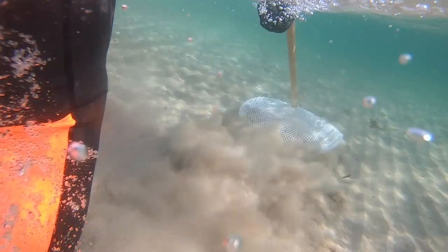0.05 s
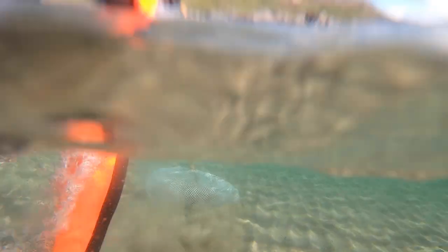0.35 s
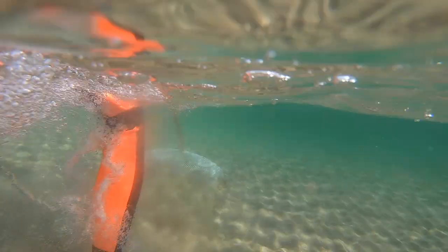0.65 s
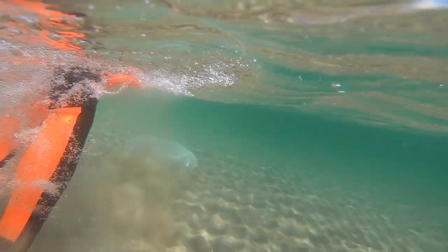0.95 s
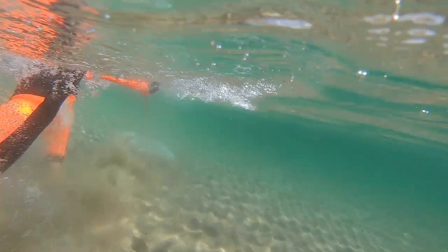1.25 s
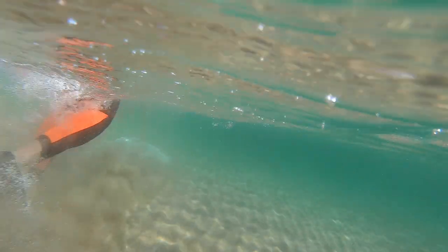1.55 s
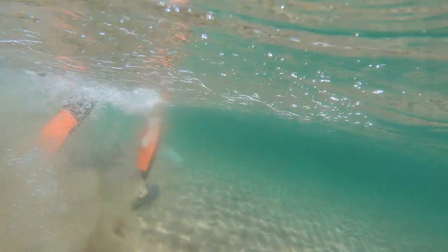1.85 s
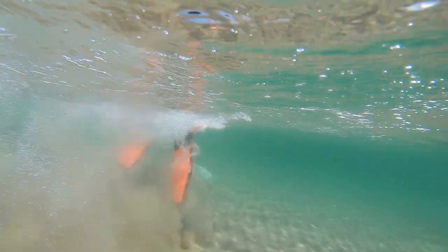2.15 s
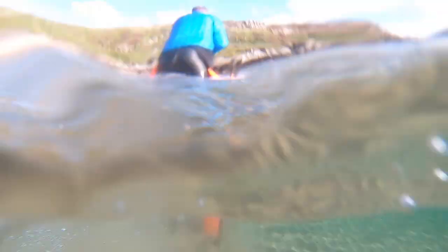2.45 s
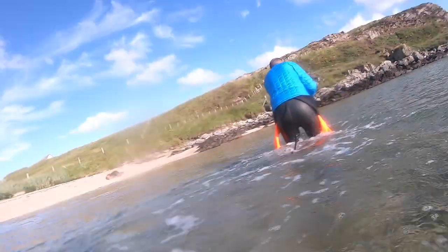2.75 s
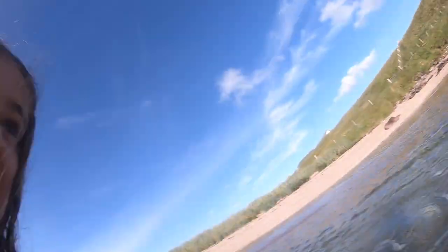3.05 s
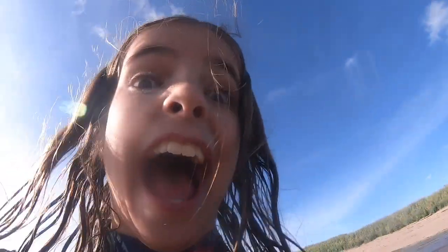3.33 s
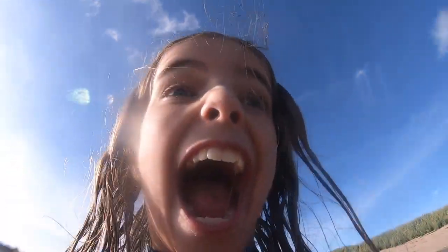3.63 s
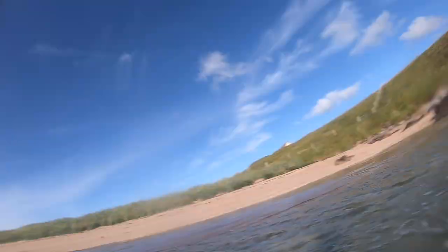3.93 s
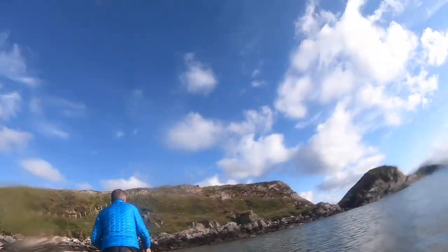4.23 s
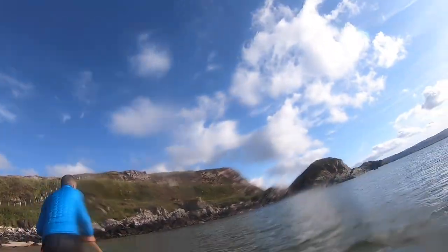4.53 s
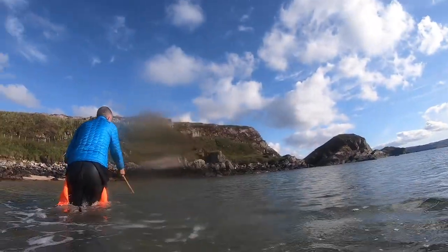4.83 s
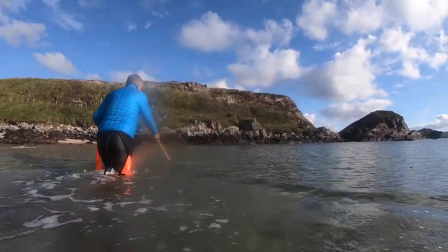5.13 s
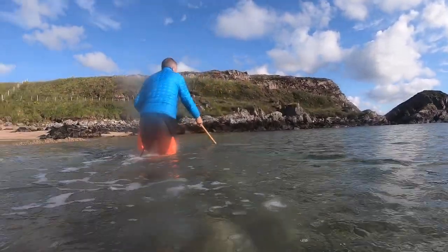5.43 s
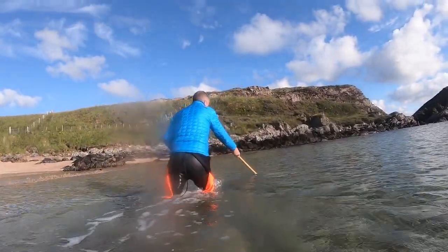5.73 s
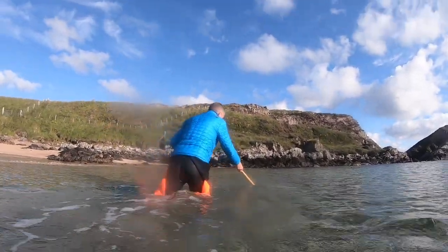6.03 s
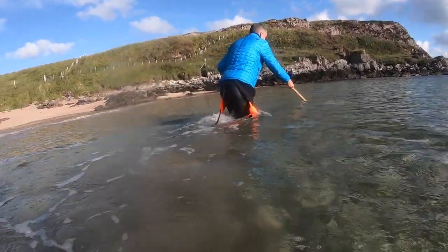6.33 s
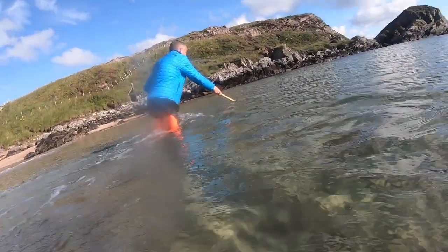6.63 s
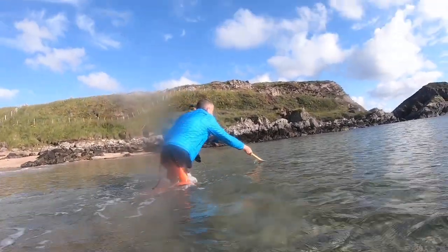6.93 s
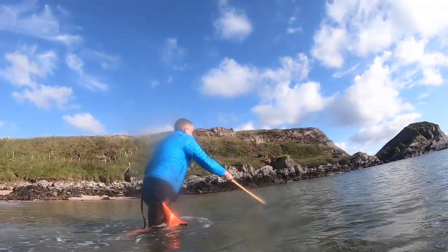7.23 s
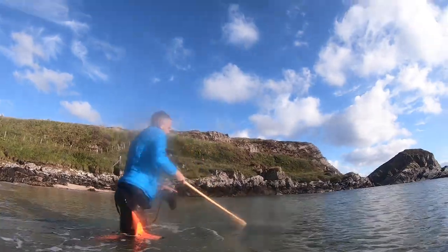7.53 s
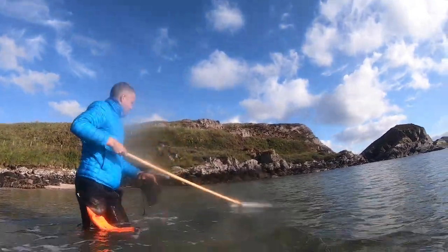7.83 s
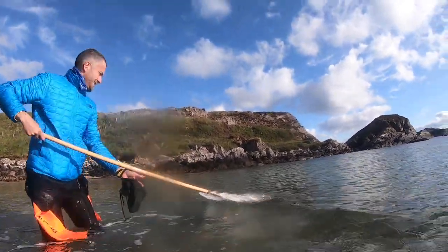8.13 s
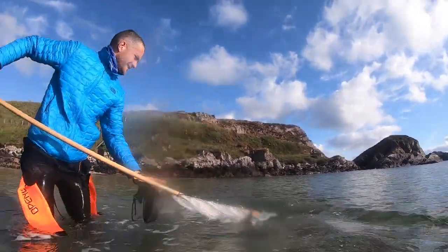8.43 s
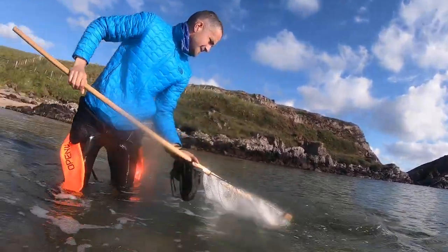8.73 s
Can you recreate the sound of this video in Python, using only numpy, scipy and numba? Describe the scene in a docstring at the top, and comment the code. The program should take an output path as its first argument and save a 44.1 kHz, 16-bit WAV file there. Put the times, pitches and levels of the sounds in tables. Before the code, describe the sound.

Muffled sloshing and the soft fizz of stirred sand surround a small waterproof microphone in the sea shallows. It rises into the open, where someone wading with a hand net sets off irregular splashes, trickles and ringing bubbles, very close. Low slaps and rumbling buffets hit the casing throughout, and for a stretch toward the end the water sounds hollow and boxed in.

```python
"""Shallow sea water sloshes in bursts of bubbles over a small waterproof housing, behind a wader's hand net.
Submerged, stirred sand and foam fizz dully; at 2.45 s the housing surfaces among lapping wavelets.
Single bubbles ring as they pop, air pockets glug, and water pours through a small cavity at the two ports.
Slaps and air buffets boom in the housing. From about 5.7 to 8.3 s the sound turns mono and hollow."""
import sys
import numpy as np
from scipy import signal
from scipy.fft import rfft, irfft, next_fast_len
from scipy.io import wavfile
from scipy.ndimage import uniform_filter1d
from numba import njit

SR = 44100
rng = np.random.default_rng(int(sys.argv[2]) if len(sys.argv) > 2 else 0)


def to_wav(s):
    """Save 16-bit WAV."""
    ch = np.atleast_2d(s).T  # columns
    pcm = np.round(np.clip(ch, -1, 1) * 32767)  # PCM
    wavfile.write(sys.argv[1], SR, pcm.astype(np.int16))


N = 391608
TIME_S, CONTROL_S = np.arange(N) / SR, np.arange(0, N / SR, .002)
SURFACING_S, LEAK_TOP_HZ = 2.45, 8700


def undb(db):
    """Decibels to gain."""
    return 10 ** (np.asarray(db) / 20)


def unit(x):
    """Scale to rms 1."""
    return x / np.sqrt(np.mean(x ** 2) + 1e-18)


def lowpass(f, edge_hz, slope):
    """Low-pass gain, 1/2 at the edge."""
    return 1 / (1 + (f / edge_hz) ** slope)


def highpass(f, edge_hz, slope):
    """High-pass gain, 1/2 at the edge."""
    return 1 / (1 + (edge_hz / f) ** slope)


def shape(x, gain):
    """Filter by a function of frequency."""
    size = next_fast_len(x.shape[-1] + 512)
    hz = np.maximum(np.fft.rfftfreq(size, 1 / SR), 1)
    return irfft(rfft(x, size) * gain(hz), size)[..., :x.shape[-1]]


def along(points, hz):
    """Interpolate (Hz, value) points in log frequency."""
    f, value = np.transpose(points)
    return np.interp(np.log(hz), np.log(f), value)


def curve(points):
    """Interpolate (s, value) points per sample."""
    return np.interp(TIME_S, *np.transpose(points))


def sampled(control):
    """Control rate to sample rate."""
    return np.interp(TIME_S, CONTROL_S, control)


def swell(start, end, rise, fall):
    """Control-rate gain: 1 from start to end, 21 dB lower per rise or fall time outside."""
    slope = np.maximum((start - CONTROL_S) / rise, (CONTROL_S - end) / fall)
    return undb(-21 * np.clip(slope, 0, 20))


def add(out, start, x):
    """Mix x in at start [s]."""
    i = int(start * SR)
    out[:, i:i + x.shape[-1]] += x[..., :N - i]


def walk(rate_hz, size=N):
    """Slewed random steps, rms near 1."""
    hold = int(SR / rate_hz)
    steps = np.repeat(rng.standard_normal(size // hold + 2), hold)
    return unit(uniform_filter1d(steps, hold))[:size]


def noise(size, apart):
    """Stereo noise; apart is the side/mid ratio."""
    mid, side = rng.standard_normal((2, size))
    return unit(np.array([mid + apart * side, mid - apart * side]))


def resonance(hz, width_hz):
    """Noise band with a moving centre."""
    a, b = unit(shape(rng.standard_normal((2, len(hz))), lambda f: lowpass(f, width_hz, 2)))
    phase = 2 * np.pi * np.cumsum(hz) / SR
    return a * np.sin(phase) + b * np.cos(phase)


@njit
def ring(size, start, hz, t60, gain, pan, glide, onset):
    """Damped sines that swell over `onset` cycles and glide up as each bubble nears the surface."""
    out = np.zeros((2, size))
    for k in range(len(start)):
        first, life = int(start[k] * SR), int(t60[k] * SR) + 2
        phasor = gain[k] + 0j
        step = np.exp(2j * np.pi * hz[k] / SR - np.log(1000) / life)
        bend = np.exp(2j * np.pi * hz[k] * glide / SR / life)
        for i in range(first, min(first + life, size)):
            cycles = (i - first) * hz[k] / SR
            y = phasor.imag * cycles ** 2 / (cycles ** 2 + onset ** 2)
            out[0, i] += y * pan[k]
            out[1, i] += y / pan[k]
            phasor, step = phasor * step, step * bend
    return out


def bubbles(size, hz, cycles, scatter_db, glide, onset):
    """Bubble cloud at the given pitches; random birth, level, decay and pan."""
    when, rank = rng.random((2, len(hz)))
    life, side = rng.standard_normal((2, len(hz)))
    hz = np.clip(hz, 150, 15000)
    gain = undb(-scatter_db * np.log(0.03 + rank))
    t60 = cycles * np.exp(0.63 * life) / hz
    return unit(ring(size, when * size / SR, hz, t60, gain, undb(2 * side), float(glide), onset + .01))


# dips in the small water sounds: (time [s], length [s])
LEVEL_DIPS = [(0.0, 0.2), (1.669, 0.047), (2.461, 0.1), (5.479, 0.18)]
def ducking_gain():
    """The small water sounds briefly dip 8 dB, mostly after loud pops."""
    dip = sum(swell(start, start + length, rise=.0089, fall=.0089) for start, length in LEVEL_DIPS)
    return sampled(undb(-8 * np.clip(dip, 0, 1)))


# sand and foam below, wavelets above: (crest [s], rise [s], fall [s], ripple [dB], fizz [dB])
WATER_SWELLS = [(.42, 0.13, 0.49, -36, -51), (.92, 0.029, 0.05, -48, -50), (1.4, 0.7, 0.34, -40.5, -57.5),
                (1.869, 0.33, 0.23, -42, -48.5), (2.77, 0.32, 0.079, -35, -53),
                (3.574, 0.43, 0.29, -36.5, -44.5), (4.17, 1, 0.92, -35.5, -57),
                (5.29, 0.22, 0.13, -30.5, -46), (5.61, 0.053, 0.067, -24.5, -40.5),
                (6.017, 0.0095, 0.13, -37.5, -38), (7.034, 0.27, 0.11, -30.5, -66),
                (8.0, 0.09, 0.66, -45.5, -62), (8.407, 0.095, 0.081, -41, -41)]
def stirring():
    """Envelopes of water motion: ripple and fizz from calm, swells and wakes; force from sloshes."""
    ripple_power = undb(np.where(CONTROL_S < SURFACING_S, -46, -44)) ** 2
    fizz_power, wake_power, force_power = undb(-61) ** 2, 0, 0
    for crest, rise, fall, ripple_db, fizz_db in WATER_SWELLS:
        envelope = swell(crest, crest, rise, fall)
        ripple_power += (envelope * undb(ripple_db)) ** 2
        fizz_power += (envelope * undb(fizz_db)) ** 2
    for start, length, db, _ in HOUSING_SLOSHES:
        crest = start + SLOSH_CREST_SHARE * length
        force_power += undb(db) ** 2 * np.exp(-((CONTROL_S - crest) / (length / 2)) ** 2)
        if start > SURFACING_S:
            wake_power += (undb(db) * swell(crest, start + length, rise=.046, fall=.052)) ** 2
    ripple_power += wake_power * undb(-14) ** 2
    fizz_power += wake_power * undb(-59) ** 2
    return [sampled(np.sqrt(power)) for power in (ripple_power, fizz_power, force_power)]


# water spectra below and above the surface: (frequency [Hz], level [dB])
SUBMERGED_EQ = [(300, -4), (930, 6), (2400, -5), (3450, -4), (5000, -8.5), (6400, -23.5), (10200, -23),
                (11500, -48)]
SURFACE_EQ = [(350, -21.5), (750, -9.5), (1350, -7.5), (1900, -2.5), (2400, -3), (3400, -6.5),
              (4600, -16.5), (7000, -32), (10000, -44.5), (13000, -67.5)]
def shallows(ripple, fizz):
    """Countless small bubbles in a soft wash, smoother under water."""
    hz = 300 + 12000 * rng.random(int(1900 * N / SR)) ** 2
    cloud = bubbles(N, hz, cycles=14, scatter_db=2.8, glide=0.03, onset=2.5)
    cloud = unit(shape(cloud, lambda f: f ** 0.77))
    above = np.clip((TIME_S - SURFACING_S) / .04, 0, 1)
    wash = noise(N, apart=0.78)
    water = above * unit(cloud + undb(-0.5) * wash) + (1 - above) * unit(cloud + undb(4) * wash)
    out = 0
    for eq, share, gurgle_db in ((SUBMERGED_EQ, 1 - above, -5.5), (SURFACE_EQ, above, -11)):
        gurgle = ripple * undb(gurgle_db)
        for lo, hi, gain in ((290, 1150, gurgle), (930, 3425, ripple), (5060, 12000, fizz)):
            band = shape(water, lambda f: undb(along(eq, f)) * highpass(f, lo, 10) * lowpass(f, hi, 10))
            out += unit(band) * share * gain
    lapping = undb(2.2 * walk(45) + 1.5 * walk(13))
    return out * lapping * ducking_gain()


# bubble pitches under water: (pitch [Hz])
PING_PITCHES_HZ = (931, 1663, 3404)
def stray_bubbles(ripple, force):
    """Stirred water sheds bubbles: steady pings below the surface, clusters of short plops above."""
    count = int(70 * N / SR)
    spread = np.clip(rng.standard_normal(count), -2, 2)
    ping_hz = rng.choice(PING_PITCHES_HZ, count) * 2 ** (.09 * spread)
    pings = bubbles(N, ping_hz, cycles=50, scatter_db=5, glide=0, onset=1)
    plops = bubbles(N, 1800 * 2 ** (.4 * spread), cycles=26, scatter_db=5.5, glide=.06, onset=2)
    clusters = np.clip(walk(12), 0, 1.5)
    above = plops * clusters * undb(-3) * (ripple + force * undb(-13))
    return np.where(TIME_S > SURFACING_S, above, pings * ripple * undb(-4)) * ducking_gain()


SLOSH_CREST_SHARE = 0.54
# slosh textures: (bubble rate [1/s], spread [oct], spray [dB], cutoff [Hz], treble leak [dB])
SUBMERGED_CHURN = (506, 0.67, 5.5, 2131, -34.5)
SURFACE_SPLASH = (380.5, .5, -8.5, 4305, -27)
# water over the housing: (time [s], length [s], level [dB], centre [Hz])
HOUSING_SLOSHES = [(0.0, 0.066, -25.5, 948), (0.105, 0.04, -15.5, 1732), (1.291, 0.073, -27, 900),
                   (1.398, 0.27, -27.5, 930), (2.081, 0.12, -23, 1230), (2.159, 0.15, -14.5, 1507),
                   (2.283, .11, -15.5, 1065), (2.709, .14, -21, 1577), (3.205, 0.088, -26, 989),
                   (3.661, 0.062, -29.5, 986), (4.214, 0.07, -24.5, 1750), (4.374, 0.036, -24, 1150),
                   (4.584, 0.044, -26.5, 1320), (4.809, 0.022, -15, 1895), (4.861, 0.071, -27.5, 1290),
                   (5.336, 0.022, -19.5, 1805), (5.386, 0.038, -18.5, 1405), (5.45, 0.019, -19, 1393),
                   (5.584, 0.095, -21, 1520), (6.143, 0.065, -29, 1845), (6.477, 0.24, -15.5, 1596),
                   (6.706, 0.054, -11, 1810), (6.777, 0.074, -22, 1470), (7.295, 0.097, -20.5, 1600),
                   (7.398, 0.052, -20, 1650), (7.687, 0.11, -25, 1703), (7.794, 0.19, -22.5, 1597),
                   (8.373, 0.11, -24.5, 2740), (8.506, 0.11, -28.5, 1302), (8.662, 0.084, -29, 1175)]
def sloshes():
    """Bubbles and spray crest, then drain; denser and duller under water."""
    out = np.zeros((2, N))
    for start, length, db, centre_hz in HOUSING_SLOSHES:
        texture = SUBMERGED_CHURN if start < SURFACING_S else SURFACE_SPLASH
        rate, spread, spray_db, cutoff_hz, leak_db = texture
        size = int(length * SR)
        hz = centre_hz * 2 ** (spread * np.clip(rng.standard_normal(int(rate * length) + 4), -1.6, 1.7))
        cloud = bubbles(size, hz, cycles=28, scatter_db=3, glide=0.12, onset=1)
        cloud = unit(shape(cloud, lambda f: f ** 0.2))
        spray = shape(noise(size, apart=1),
                      lambda f: (1 + (np.log2(f / centre_hz) / spread) ** 2 / 7) ** -2)
        swell_db = np.interp(np.linspace(0, 1, size), [0, SLOSH_CREST_SHARE, 1], [-2.5, 0, -4])
        envelope = undb(swell_db + 3.3 * walk(120, size)) * signal.windows.tukey(size, .08)
        wash = (cloud + undb(spray_db) * unit(spray)) * envelope
        muffled = shape(wash, lambda f: highpass(f, 380, 4)
                        * (lowpass(f, cutoff_hz, 20) + undb(leak_db) * lowpass(f, LEAK_TOP_HZ, 8)))
        add(out, start, undb(db - 3.5) * unit(muffled))
    return out


FLOODED_UNTIL_S, FLOODED_TUNING = 4.3, .87
# housing response: (frequency [Hz], level [dB])
HOUSING_EQ = [(25, -13), (90, -10), (150, -1), (187, 7.5), (245, -11.5), (450, -9.5)]
# pushes of water or air: (time [s], length [s], level [dB])
HOUSING_BUFFETS = [(0.0, 0.011, -16), (0.112, 0.011, -24.5), (1.283, 0.023, -31), (1.405, 0.057, -28.5),
                   (2.083, 0.086, -29.5), (2.595, 0.25, -34), (3.074, 0.19, -20.5), (3.902, 0.41, -33.5),
                   (4.133, 0.094, -19.5), (4.386, 0.1, -29), (6.393, 0.37, -24.5), (6.923, 0.16, -30)]
def housing_rumble(ripple, force):
    """Buffets, ripples and sloshes shake the housing; water inside lowers its resonance."""
    def body(tuning):
        return unit(shape(noise(N, apart=0.077), lambda f: undb(along(HOUSING_EQ, f / tuning))
                          * lowpass(f, 330 * tuning, 8) * highpass(f, 25, 1)))

    buffet_power = sum((undb(db) * swell(start, start + length, rise=.023, fall=.076)) ** 2
                       for start, length, db in HOUSING_BUFFETS)
    power = sampled(buffet_power) + (ripple * undb(-7.5)) ** 2 + (force * undb(-15.5)) ** 2
    drained, flooded = body(1), body(FLOODED_TUNING)
    rumble = np.where(TIME_S < FLOODED_UNTIL_S, flooded, drained)
    shudder = unit(shape(noise(N, apart=.06), lambda f: lowpass(f, 107, 6) * highpass(f, 20, 2)))
    return (rumble * np.sqrt(power) + shudder * power * undb(10.5)) * undb(3 * walk(30))


# close bursting bubbles: (time [s], level [dB], pitch [Hz], t60 [s])
BUBBLE_POPS = [(0.002, -10, 1644, 0.05), (0.0408, -2, 882, 0.017), (0.126, -11.5, 2267, 0.043),
               (0.351, -25, 1690, 0.03), (0.9278, -12, 1680, 0.0063), (0.938, -16.5, 1747, 0.055),
               (0.9494, 2.5, 1965, 0.0022), (1.6416, 0, 1094, 0.0061), (1.696, -13.5, 1260, 0.034),
               (1.8668, -3, 1800, .0023), (2.077, -14.5, 1354, 0.018), (2.124, -10.5, 1097, 0.031),
               (2.366, 2, 950, 0.03), (2.417, -3.5, 2120, 0.034), (2.461, -2.5, 1813, 0.019),
               (2.528, -10, 1960, 0.061), (2.5513, -6.5, 1480, 0.02), (2.5945, -7, 1673, 0.044),
               (2.6129, -2, 2100, 0.0067), (2.6955, -5, 1476, 0.025), (2.7215, -6.5, 1620, .012),
               (2.739, -2, 1262, 0.023), (2.786, -1, 1587, 0.022), (2.8099, -10, 2014, 0.028),
               (2.8433, -12.5, 778, 0.041), (2.8487, -8.5, 1680, 0.058), (3.219, -1.5, 1420, 0.0085),
               (3.2584, -3, 719, 0.015), (3.6758, -0.5, 1146, 0.011), (3.6948, -10.5, 755, 0.014),
               (3.7292, -11.5, 2100, 0.017), (3.8031, -3.5, 748, 0.0098), (3.802, -6.5, 1770, 0.013),
               (3.8255, -12, 845, 0.014), (4.02, -1.5, 2050, 0.02), (4.182, -12.5, 2020, 0.018),
               (4.246, -14, 2550, 0.018), (4.392, -10, 2020, 0.015), (4.5727, -2.5, 1790, 0.0038),
               (4.8309, -0.5, 1950, 0.0016), (5.344, 2.5, 1070, 0.0066), (5.354, -2, 2050, 0.007),
               (5.388, -13.5, 1580, 0.041), (5.414, -11, 2060, 0.021), (5.472, -4, 567, 0.021),
               (5.494, -12.5, 2210, 0.026), (5.581, -8.5, 1360, 0.015), (5.5875, -11, 2200, 0.021),
               (6.0094, -8, 2110, 0.0024), (6.1312, -12, 1548, 0.18), (6.561, -11, 3640, 0.013),
               (6.715, 1, 1770, 0.01), (6.729, 1, 1900, 0.0032), (6.7517, -1, 1840, 0.0071),
               (6.7636, -10, 1180, 0.082), (7.2911, -1, 1930, 0.013), (7.2992, -6.5, 1885, 0.021),
               (7.355, -14.5, 1360, 0.015), (7.419, -7.5, 1760, 0.011), (7.424, -0.5, 1620, 0.0038),
               (7.698, -8.5, 1150, 0.014), (7.7196, -12.5, 1590, 0.073), (7.761, -15, 2890, 0.071),
               (7.9468, -11.5, 1512, 0.062), (8.349, -14, 2970, 0.05), (8.406, -12, 3090, 0.032),
               (8.431, -10, 2850, 0.017), (8.4905, -4.5, 2116, .017)]
def pops():
    """A bubble rings at a wandering pitch with a brief upper mode, and splats as its film tears."""
    out, t = np.zeros((2, N)), np.arange(3000) / SR
    for start, db, hz, t60 in BUBBLE_POPS:
        phase = 2 * np.pi * np.cumsum(hz * (1 + .048 * walk(180, len(t)))) / SR
        attack_s = .057 * min(t60, .035)
        upper = undb(-11.5 - 60 * t / .05) * np.sin(1.427 * phase)
        tone = (np.sin(phase) + upper) * undb(-60 * np.maximum(t - attack_s, 0) / t60)
        splat = shape(noise(len(t), apart=1),
                      lambda f: lowpass(f, 4500, 2) / (1 + (np.log2(f / hz) / 0.43) ** 2))
        splat = unit(splat) * undb(-6.5 - 60 * t / .018)
        add(out, start, undb(db) * (tone + splat) * (1 - np.exp(-(t / attack_s) ** 2)))
    return out


# surfacing air: (time [s], length [s], level [dB], first pitch [Hz], last pitch [Hz])
AIR_GLUGS = [(.002, .1, -19, 356, 813), (5.515, 0.052, -16, 995, 1090), (5.638, 0.048, -22, 550, 867),
             (6.02, 0.026, -20, 388, 1047), (6.789, 0.026, -10.5, 599, 925),
             (7.724, 0.065, -21.5, 340, 1050)]
def glugs():
    """Large air pockets: a wobbling tone that bends up ever faster."""
    out = np.zeros((2, N))
    for start, length, db, first_hz, last_hz in AIR_GLUGS:
        size = int(length * SR)
        age = np.linspace(0, 1, size)
        hz = (first_hz + (last_hz - first_hz) * age ** 2) * (1 + .04 * walk(250, size))
        envelope = undb(db - 7 * age + 2 * walk(200, size)) * signal.windows.tukey(size, .4)
        add(out, start, envelope * np.sin(2 * np.pi * np.cumsum(hz) / SR))
    return out


# submerged foam: (start [s], end [s], level [dB], first centre [Hz], last centre [Hz])
FOAM_PATCHES = [(.19, .6, -50.5, 5900, 6300), (.34, .56, -45.5, 5200, 4800), (1.16, 1.575, -50, 5600, 6100),
                (.2, 1.61, -60.5, 9600, 9150), (1.85, 2.28, -52, 9550, 9200)]
def foam():
    """Each patch sputters in its own band, which drifts as the bubbles change size."""
    out, t = np.zeros((2, N)), TIME_S[TIME_S < SURFACING_S]
    for start, end, db, first_hz, last_hz in FOAM_PATCHES:
        hz = np.interp(t, [start, end], [first_hz, last_hz])
        envelope = sampled(swell(start, end, rise=.04, fall=.06))[:len(t)]
        sputter = undb(db + 2 * walk(20, len(t)) + 2 * walk(140, len(t)))
        add(out, 0, envelope * sputter * np.array([resonance(hz, width_hz=380) for _ in range(2)]))
    return shape(out, lambda f: lowpass(f, 10600, 30))


# tiny foam bubbles: (time [s], level [dB], pitch [Hz])
FOAM_SNAPS = [(1.833, -11.5, 6800), (1.8677, -3, 7260), (2.7156, -10.5, 6800), (2.7218, -13, 5100)]
def snaps():
    """A tiny bubble bursts with a few milliseconds of high ring."""
    out, t = np.zeros((2, N)), np.arange(3000) / SR
    envelope = undb(-60 * t / .0058) * (1 - np.exp(-t / 54e-6))
    for start, db, hz in FOAM_SNAPS:
        add(out, start, undb(db + 9.5) * np.sin(2 * np.pi * hz * t) * envelope)
    return out


CRACKLE_PER_S = 110
# foam on the rising housing: (time [s], length [s], level [dB])
FOAM_CRACKLES = [(2.16, .22, -52.5), (2.586, .21, -39)]
def crackle():
    """Foam bursts on the housing in sharp, separate ticks."""
    out = np.zeros((2, N))
    for start, length, db in FOAM_CRACKLES:
        hz = 7000 * 2 ** (0.45 * rng.standard_normal(int(CRACKLE_PER_S * length)))
        ticks = bubbles(int(length * SR), hz, cycles=35, scatter_db=3, glide=.1, onset=1)
        add(out, start, undb(db) * ticks)
    return out


# small cavity at the ports: (time [s], resonance [Hz])
CAVITY_PITCH = [(4.15, 1910), (4.9, 1620), (5.09, 1860), (5.3, 1960), (6.15, 1560), (7.0, 1620),
                (7.57, 1900), (8.0, 1650), (8.4, 2300)]
# water pouring off the housing: (crest [s], rise [s], fall [s], level [dB])
CAVITY_POURS = [(3.56, 0.1, 0.088, -23.5), (5.28, 0.48, .1, -29)]
def trickle(ripple, force):
    """Ripples, sloshes and gulping pours sound the cavity, whose pitch wavers with its size."""
    hz = curve(CAVITY_PITCH) * (1 + .03 * walk(18))
    pours = sum(undb(db) * swell(crest, crest, rise, fall) for crest, rise, fall, db in CAVITY_POURS)
    gulps = undb(3 * walk(70))
    drive = ripple * undb(-8) + force * undb(-20.5) + sampled(pours) * gulps
    return resonance(hz, width_hz=151) * drive * (TIME_S > SURFACING_S) * ducking_gain()


SLAP_HZ, DRAIN_HZ_PER_S, SLAP_HOLD_S, SLAP_T60_S = 160.5, 5.03, .0098, .13
# water slaps: (time [s], level [dB])
HOUSING_SLAPS = [(3.26, -8.5), (3.669, -15.5), (3.802, -16.5), (4.381, -9.5), (4.721, -16.5), (5.473, -6.5),
                 (5.869, -16.5), (6.145, -15.5), (6.368, -8.5), (6.736, -7), (6.985, -13), (7.193, -10),
                 (7.422, -6), (7.593, -12.5), (7.892, -7), (8.579, -16)]
def slaps():
    """Slaps ring the housing unevenly; its low resonance rises as it drains."""
    out, t = np.zeros((2, N)), np.arange(9000) / SR
    attack = 1 - np.exp(-(t / .0025) ** 2)
    decay_db = -60 * np.maximum(t - SLAP_HOLD_S, 0) / SLAP_T60_S
    for start, db in HOUSING_SLAPS:
        hz = SLAP_HZ + DRAIN_HZ_PER_S * (start - SURFACING_S)
        phase = 2 * np.pi * np.cumsum(hz * (1 + 0.088 * walk(110, len(t)))) / SR
        boom = np.sin(phase) * undb(decay_db + 2 * walk(83, len(t)))
        add(out, start, undb(db - 5) * boom * attack)
    return out


# hollow colour of the mono stretch: (frequency [Hz], gain [dB])
HOLLOW_EQ = [(600, 5.5), (1100, -10), (1600, 0.5), (2100, -8.5), (2500, -13), (2850, -4), (3300, -1),
             (3900, 5)]
def hollow(water):
    """Notched mids and a steep top edge, with a little treble leaking past."""
    return shape(water, lambda f: undb(along(HOLLOW_EQ, f)) * lowpass(f, 4280, 30)
                 + undb(-11) * lowpass(f, LEAK_TOP_HZ, 8))


# right port lag: (frequency [Hz], lag [rad])
RIGHT_LAG = [(260, -1.05), (520, -1.07), (860, -1.5), (1290, -4.5), (2400, -6), (6000, -3.5)]
# right port sensitivity: (frequency [Hz], gain [dB])
RIGHT_EQ = [(400, 4), (1500, 5), (3500, 2.5)]
def wet_ports(sound):
    """The wet ports ring out of step; the right is more sensitive."""
    right = shape(sound[1], lambda f: np.exp(-1j * along(RIGHT_LAG, f)) * undb(along(RIGHT_EQ, f)))
    return np.array([sound[0], right])


# stereo width: (time [s], width [0 mono, 1 wide])
STEREO_WIDTH = [(5.68, 1), (5.8, 0.045), (8.15, 0.012), (8.33, 1)]
def scene():
    """Water at two ports, folding to hollow mono from about 5.7 to 8.3 s, plus the housing's boom."""
    ripple, fizz, force = stirring()
    width = curve(STEREO_WIDTH)
    water = shallows(ripple, fizz) + sloshes() + stray_bubbles(ripple, force) + trickle(ripple, force)
    water = width * water + (1 - width) * hollow(water)
    sound = water + foam() + crackle() + pops() + snaps() + glugs()
    stereo = width * wet_ports(sound) + (1 - width) * sound.mean(axis=0)
    return stereo + slaps() + housing_rumble(ripple, force)


def record(dry):
    """Soft clip, then low-pass at 16.3 kHz."""
    clipped = dry / (1 + dry ** 6) ** (1 / 6)
    return signal.sosfilt(signal.ellip(8, .2, 70, 16300, fs=SR, output="sos"), clipped)


dry = scene()
out = record(dry)
to_wav(out)
```